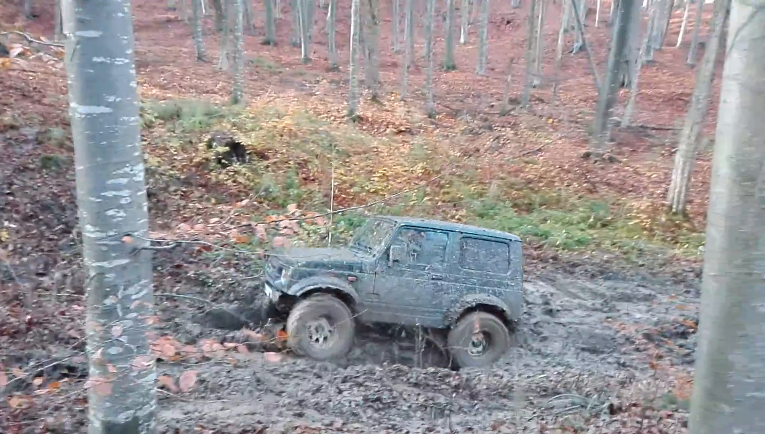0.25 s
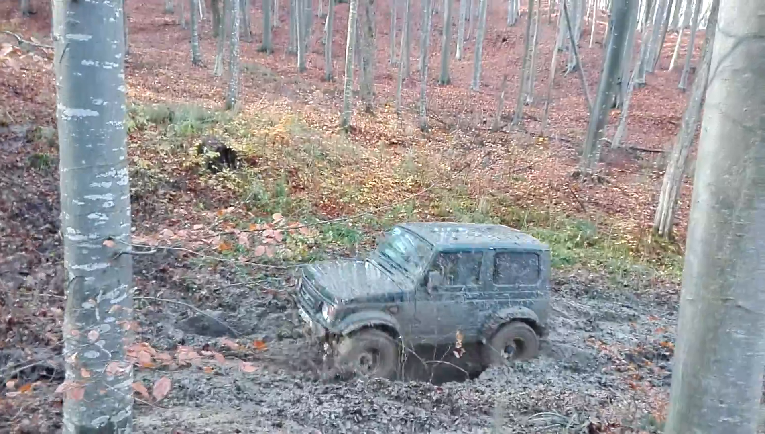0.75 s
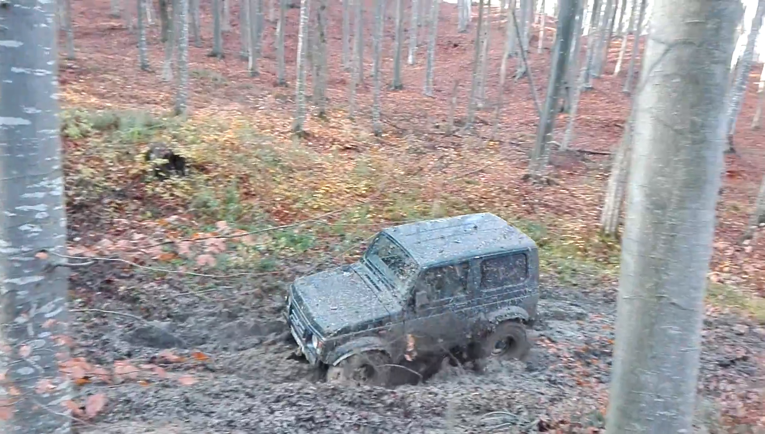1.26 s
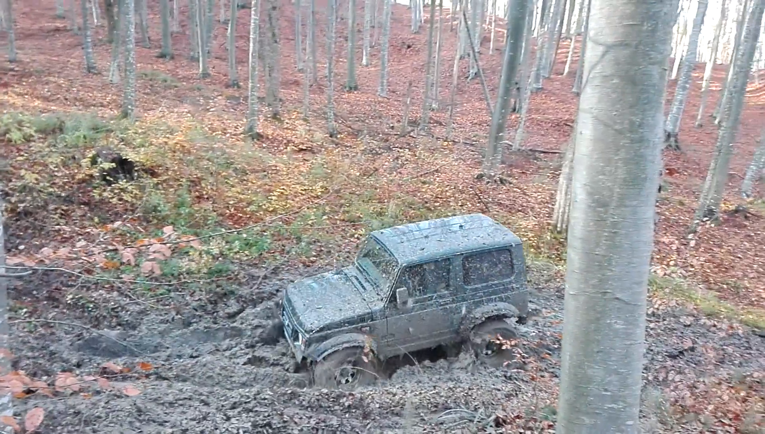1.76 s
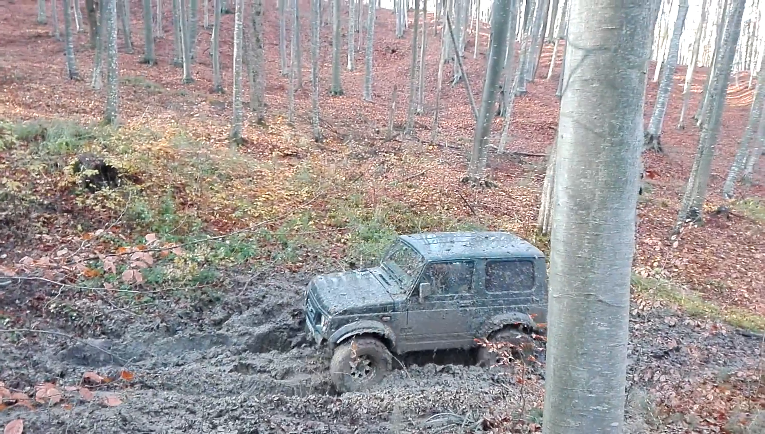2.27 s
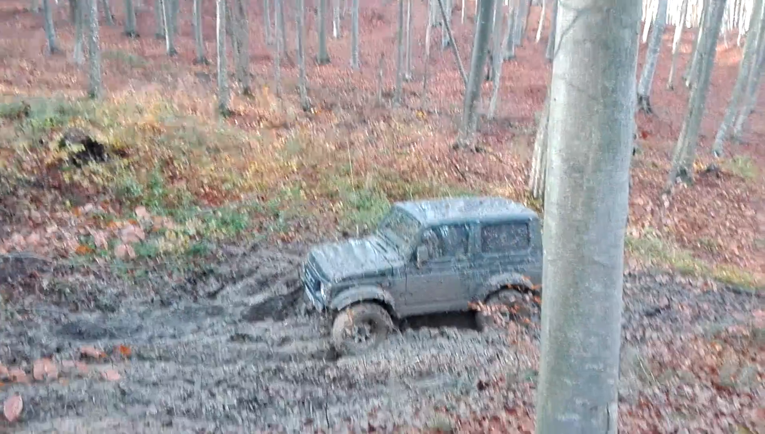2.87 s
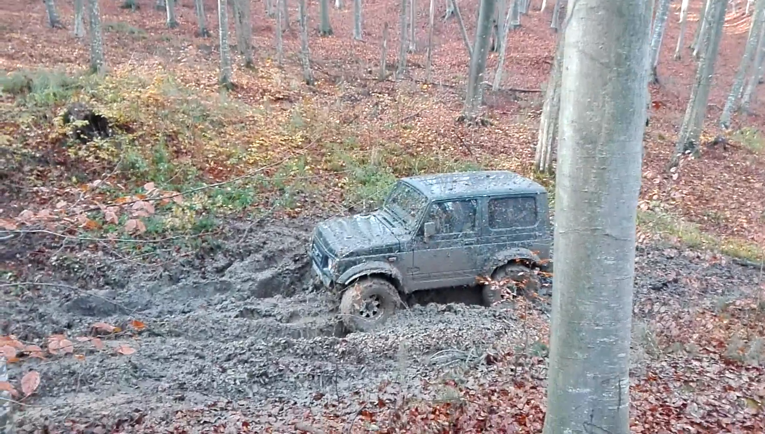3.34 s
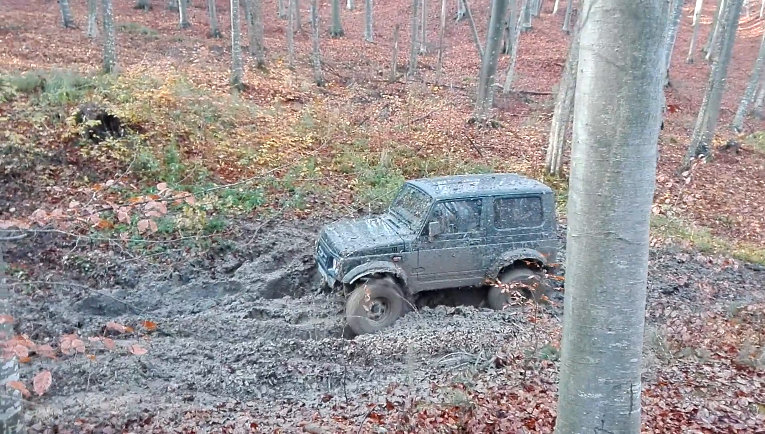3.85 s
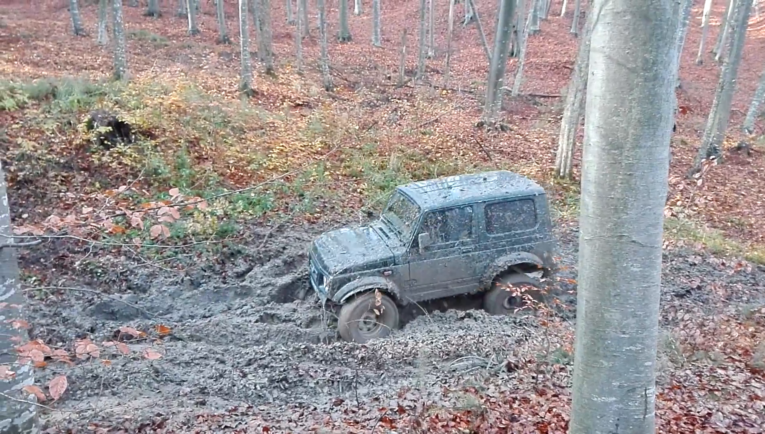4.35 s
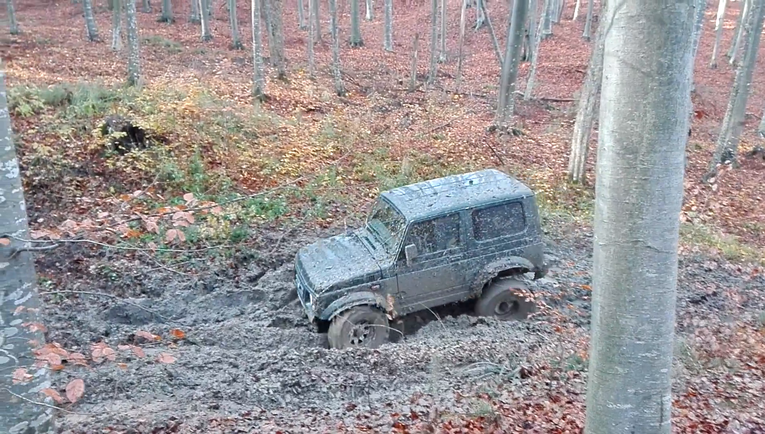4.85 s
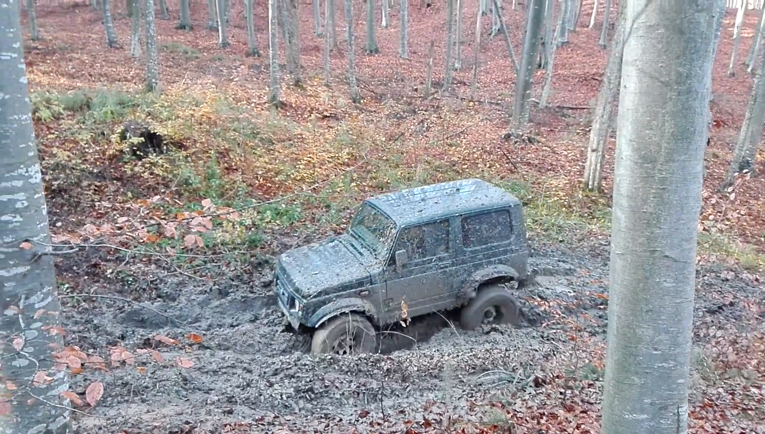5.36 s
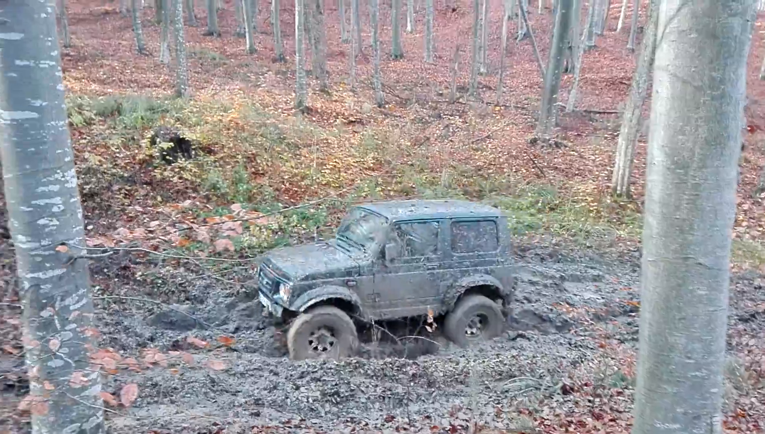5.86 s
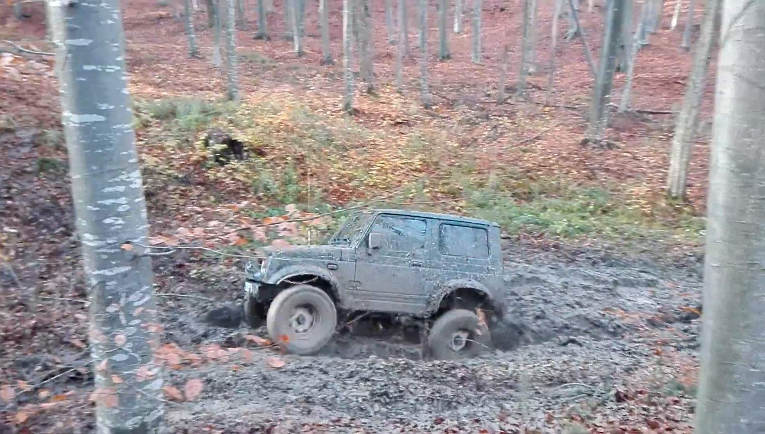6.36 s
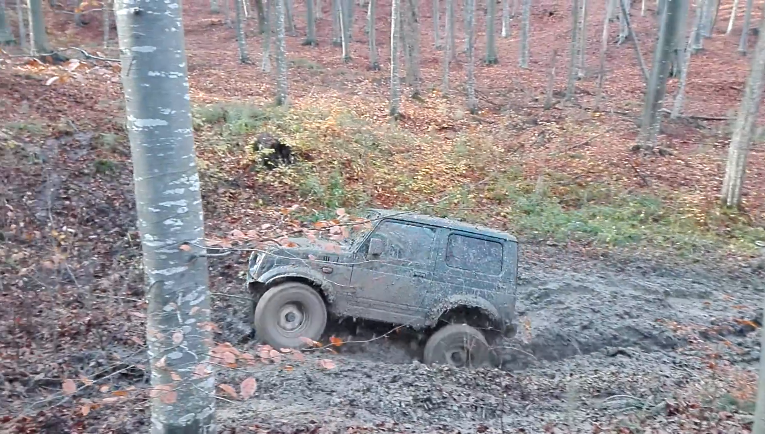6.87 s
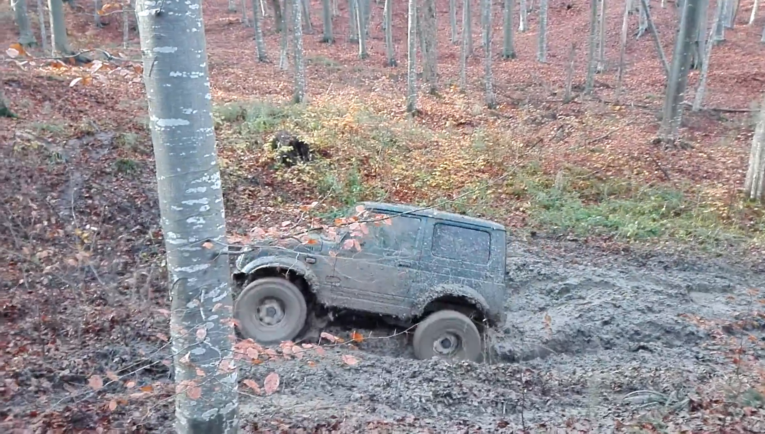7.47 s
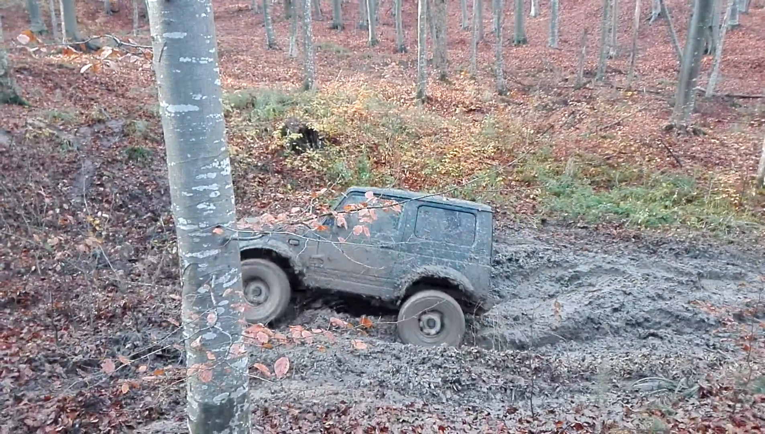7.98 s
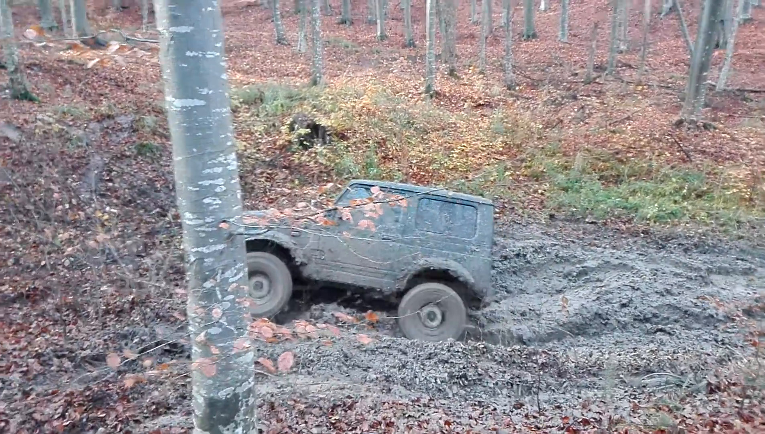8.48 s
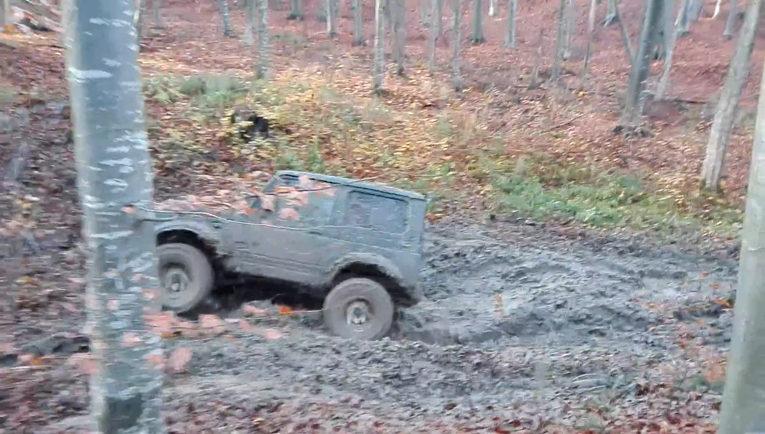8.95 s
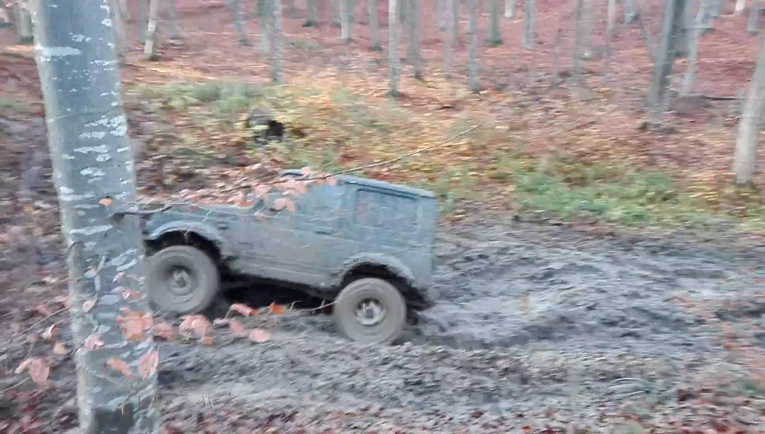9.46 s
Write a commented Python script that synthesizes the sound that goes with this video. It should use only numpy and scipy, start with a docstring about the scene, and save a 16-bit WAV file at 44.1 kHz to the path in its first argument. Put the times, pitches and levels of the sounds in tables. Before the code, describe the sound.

From the start a small four-cylinder engine is already pulling, its low, nearly pure hum strengthening by 0.4 s and rising to a peak near 1.6 s, with wavering overtones, breathy intake roar, clatter and a grainy hiss of flung mud. Around 1.9 s the throttle lifts: a soft thump, the roar and hiss drop, and pitch sags until about 3 s, with light clod ticks between 2.2 and 3 and dull misfires near 2.6 and 3. It revs abruptly, stumbles with thumps around 3.3-3.4, peaks highest near 3.7, then eases by 4.2. From there the pitch climbs gradually, holding around 6.5-7 and cresting about 8.4, while roar and wet hiss swell in waves. One clod ticks near 8.9; it ends still revving. Low shaking and rumble continue beneath. The outdoor sound is dry and central, treble flickering in stereo.

```python
"""A small four-cylinder off-roader revs in deep forest mud, its nearly pure firing tone trailed by wavering overtones.
Throttle-driven intake and block noise roars under a hiss of fan and flung mud, its treble in patchy stereo.
Near two seconds it lifts off: revs and roar drop, the firing tone sags, misfires thump and clods tick.
At three seconds it revs again, peaks before four, eases back, then climbs in waves to the end; a late clod ticks.
Tones follow one engine phase, noises are shaped by frequency, and a low shake and rumble run beneath it all."""
import sys
import numpy as np
from scipy import signal
from scipy.fft import rfft, irfft, next_fast_len
from scipy.io import wavfile
from scipy.ndimage import uniform_filter1d, map_coordinates

SR = 44100
rng = np.random.default_rng(int(sys.argv[2]) if len(sys.argv) > 2 else 0)


def unload_audio(sound):
    """Save the sound as a 16-bit wav file, at the path given as the first command line argument."""
    columns = np.transpose(np.atleast_2d(sound))
    # keep every value between -1 and 1, then stretch to whole-number steps
    steps = np.round(np.clip(columns, -1, 1) * 32767)
    wavfile.write(sys.argv[1], SR, steps.astype(np.int16))


def magnitude_from_level(level_db):
    """Linear magnitude for a level in decibels (20 dB per decade)."""
    exponent = np.asarray(level_db, float) / 20
    return 10 ** exponent


N = 428652
T = np.arange(N) / SR

# engine speed: start_s, firing_rate_hz
ENGINE_SPEED = [(0.0, 118.8), (0.19, 123.5), (0.21, 127.2), (0.73, 142.5), (1.16, 137.7), (1.33, 141.6),
                (1.54, 171.3), (1.65, 173.6), (1.78, 152.3), (1.87, 151.7), (1.92, 143.3), (2.62, 108.8),
                (2.81, 98.3), (2.98, 97.5), (3.0, 99.5), (3.14, 127.6), (3.22, 144.3), (3.38, 138.5),
                (3.46, 138.9), (3.68, 179.6), (3.74, 182.3), (3.79, 179.6), (3.95, 141), (4.11, 141),
                (4.2, 135.8), (4.63, 136.2), (5.68, 164.6), (6.47, 170.6), (7.06, 170.2), (8.42, 182.4),
                (8.77, 174.5), (9.31, 174.8), (9.72, 180.6)]
# firing tone before its sags: start_s, level_db
FIRING_TONE = [(0, -20), (.16, -32), (.24, -17), (.42, -9.5), (.9, -12), (1.22, -12.5), (1.43, -12),
               (1.5, -15.5), (1.78, -16), (2.85, -15.5), (3.4, -14), (3.7, -16.5), (4.2, -16.5),
               (4.45, -22), (4.78, -18.5), (5.05, -12.5), (5.4, -10), (5.68, -11), (5.75, -14.5),
               (6.02, -15.5), (6.27, -12), (6.85, -10.5), (7.0, -14), (7.55, -15.5), (8.0, -18),
               (8.78, -20), (9.16, -22.5), (9.72, -19.5)]
# brief dips of the firing tone under unsteady load: deepest_s, fall_s, recovery_s, depth_db
TONE_SAGS = [(1.374, .1, 0.038, 3), (1.874, 0.1, 0.17, 5), (2.414, 0.13, .15, 7),
             (2.954, 0.075, 0.039, 5.5), (3.134, .12, .04, 3), (3.235, 0.043, 0.046, 11),
             (3.41, .02, 0.26, 7), (3.728, 0.027, .05, 3), (3.93, 0.099, 0.092, 3.5),
             (4.102, 0.058, 0.084, 2.5), (4.254, .06, .1, 3)]
# mean levels of the wavering partials: start_s, half_rate_db, double_rate_db, triple_rate_db
PARTIALS = [(0, -51, -37, -48), (.18, -58, -36, -38), (.4, -53, -44, -45.5), (.6, -53, -39, -49),
            (.8, -62, -33, -43), (1.08, -55, -34, -51), (1.26, -59, -42, -48), (1.44, -57, -39.5, -47),
            (1.65, -55, -41.5, -54), (2.0, -51, -43.5, -52), (2.3, -51, -41, -55.5), (2.52, -52, -52, -55),
            (2.75, -57, -51, -57), (2.9, -55, -44, -63), (2.96, -50, -33, -51), (3.05, -58, -43, -52),
            (3.15, -55, -43, -42.5), (3.25, -48, -50, -64), (3.5, -51, -50, -48), (3.75, -41, -36.5, -50),
            (3.95, -63, -48, -46), (4.2, -50, -41, -37), (4.77, -55, -35.5, -40), (5.19, -49, -46.5, -46),
            (5.61, -51, -32.5, -41), (6.1, -54, -37.5, -40.5), (6.5, -42, -32.5, -62),
            (6.87, -44, -42.5, -46), (7.5, -45, -39, -48), (7.9, -44, -46, -53), (8.3, -39.5, -41.5, -50),
            (8.9, -45, -35, -51), (9.72, -41.5, -38.5, -50)]
# silencer's pass curve for the upper overtones: pitch_hz, gain_db
SILENCER_PASS = [(370, 1), (450, 14), (520, -7), (600, 2.5), (680, -0.5), (750, -2), (820, -1), (900, 2.5)]
# an upper overtone stands out: centre_s, half_length_s, firing_rate_multiple, rise_db
OVERTONE_FLARES = [(.4, .15, 5, 6), (.9, .15, 4, 7), (1.4, .2, 4, 6), (2.5, .3, 4, 7), (3.049, 0.09, 4, 9),
                   (3.6, .1, 4, 8), (3.75, 0.088, 5, 10.5), (4.0, .12, 4, 8), (4.1, .2, 5, 10),
                   (4.95, .2, 5, 11), (5.2, .15, 4, 9), (6.7, .35, 4, 6), (8.1, .2, 5, 6.5),
                   (8.85, .25, 5, 10)]
# throttle, heard as the level of the roar: start_s, level_db
THROTTLE_ROAR = [(0, -43.5), (.62, -39.5), (1.0, -42), (1.8, -42), (1.98, -50), (2.6, -52.5), (2.92, -55),
                 (2.98, -47), (3.15, -43), (3.25, -48), (3.49, -46.5), (3.6, -39.5), (3.74, -38.5),
                 (4.2, -41), (4.98, -42.5), (5.44, -40), (5.68, -38.5), (5.8, -41), (6.47, -39),
                 (7.0, -42.5), (7.5, -41), (7.75, -44.5), (8.3, -42.5), (9.07, -42.5), (9.72, -40)]
# intake boom and panel ring against the roar, before trims: start_s, boom_db, ring_db
BOOM_AND_RING = [(0, -4.5, 0.5), (.9, -3.5, -3), (1.6, -2.5, -9), (1.95, -6.5, -4), (2.6, -9, -4),
                 (2.92, -7, -2), (3.0, -1, 0), (3.12, -1.5, 5), (3.35, -9.5, -2), (3.55, -3, -1.5),
                 (4.2, -1.5, 0), (4.6, -4.5, -2.5), (5.6, -4, -3), (6.4, -4.5, -5), (6.8, -3.5, 2),
                 (7.5, -5, -4), (7.8, -1.5, 0), (8.5, -4, 4.5), (9.1, -5, -4.5), (9.72, -4, -2.5)]
# spectrum of the main roar: pitch_hz, relative_level_db
ROAR_SPECTRUM = [(600, -42.5), (900, -8.5), (1050, -2), (1400, -3), (1900, -9), (2600, -2), (5000, -41)]
# resonances of block and intake: pitch_hz, width_hz, gain_db
BLOCK_RESONANCES = [(1193, 410, 5), (1310, 120, 2.5)]
# spectrum of the intake boom: pitch_hz, relative_level_db
BOOM_SPECTRUM = [(30, -4), (200, -8), (450, -3), (700, -0.5), (880, -2.5), (1100, -24)]
# spectrum of the ringing panel: pitch_hz, relative_level_db
PANEL_SPECTRUM = [(1380, -31), (1500, -9), (1600, 4.5), (1700, -3), (1900, -19)]
# churning tyres: start_s, hiss_db, spray_over_hiss_db
TYRE_LEVELS = [(0, -41, -14), (.1, -39.5, -14.5), (.62, -36, -14), (1.2, -39.5, -14.5), (1.8, -43, -15.5),
               (1.98, -46, -15), (2.6, -49.5, -12.5), (2.9, -54.5, -11.5), (3.08, -43, -18),
               (3.41, -47, -17), (3.62, -40.5, -17.5), (4.2, -37.5, -14.5), (4.76, -40, -16.5),
               (5.44, -37.5, -17), (5.85, -39, -16.5), (6.28, -38, -17), (6.47, -36.5, -12),
               (6.8, -36, -14.5), (7.01, -42, -15.5), (7.5, -42, -16.5), (8.25, -40.5, -16.5),
               (8.53, -38, -14), (9.07, -40, -15.5), (9.72, -40, -13)]
# spectrum of the hiss: pitch_hz, relative_level_db
HISS_SPECTRUM = [(900, -6), (1600, -7), (2200, -6.5), (3000, 0), (4100, -7.5), (5100, -6.5), (6500, -11),
                 (8200, -21.5), (10000, -27.5)]
# spectrum of the brighter spray: pitch_hz, relative_level_db
SPRAY_SPECTRUM = [(5000, -30), (7500, 4), (9000, -5), (10500, 1), (12500, -3), (15000, -7)]
# body resonances in hiss and spray: pitch_hz, width_hz, gain_db
BODY_RESONANCES = [(1950, 115, 7), (2844, 200, -1), (3590, 84, 3), (5000, 300, 1.5), (5510, 200, 3.5)]
# patchy stereo, the random level a treble band must pass to let its side through: pitch_hz, threshold_spreads
SIDE_THRESHOLDS = [(4100, 2.3), (5000, 1.0), (6000, -.1), (7500, -.8), (11000, -1.3), (13500, -.6)]
# a cylinder misses or backfires: centre_s, level_db, pitch_hz
MISFIRE_EVENTS = [(1.889, -23, 90), (2.6, -28, 85), (2.96, -30, 65), (3.26, -21, 91), (3.40, -24, 90)]
# clods strike the body, before a trim: start_s, level_db, pitch_hz
CLOD_EVENTS = [(2.263, -37.5, 2797), (2.368, -49, 8002), (2.461, -45.5, 7000), (2.838, -57.5, 8403),
               (2.943, -44, 5397), (8.857, -35.5, 5900)]
# uneven cylinders shake at fractions of the firing rate: firing_rate_multiple, level_over_shake_db
SHAKE_ORDERS = [(.25, -14), (.75, -5), (1.25, -2.5), (1.5, -23)]
# spectrum of the shaking noise: pitch_hz, relative_level_db
SHAKE_SPECTRUM = [(15, -14), (30, -15.5), (50, -10.5), (90, -3.5), (140, 2.5), (300, -16.5)]
# spectrum of the low rumble, free of the throttle: pitch_hz, relative_level_db
LOW_RUMBLE_SPECTRUM = [(15, -6.5), (30, -5), (55, -0.5), (90, -12), (250, -13), (400, -14), (600, -24)]
# spectrum of the narrow ring, free of the throttle: pitch_hz, relative_level_db
NARROW_RING_SPECTRUM = [(1200, -24), (1265, -6), (1290, 0.5), (1320, -7), (1400, -25)]


def curves(rows):
    """Join a table's columns by straight lines in time."""
    s, *columns = np.transpose(rows)
    return [np.interp(T, s, c) for c in columns]


def unit(x):
    """Scale to rms 1."""
    return x / np.sqrt(np.mean(x ** 2))


def walk(rate):
    """Random levels held 1 / rate s and slewed twice; spread 1."""
    k = int(SR / rate)
    held = np.repeat(rng.standard_normal(N // k + 1), k)
    return unit(uniform_filter1d(uniform_filter1d(held, k), k)[:N])


def colour(x, points, peaks=()):
    """Shape a noise by (Hz, dB) points, raise its resonances and scale it to rms 1."""
    size = next_fast_len(N)
    hz = np.maximum(np.arange(size // 2 + 1) * SR / size, 1)
    at, db = np.transpose(points)
    gain_db = np.interp(np.log(hz), np.log(at), db, left=-90, right=-90)
    gain_db += sum(peak_db / (1 + (2 * (hz - f) / width) ** 2) for f, width, peak_db in peaks)
    spectrum = rfft(x, size, axis=-1) * magnitude_from_level(gain_db)
    return unit(irfft(spectrum, size, axis=-1)[..., :N])


def exhaust(phase, *order_db):
    """Crank-rate tone, firing tone and overtones; higher orders tremble more in level and phase."""
    tones = 0
    for k, db in zip((.5, 1, 2, 3, 4, 5), order_db):
        level = np.sqrt(2) * magnitude_from_level(db + 0.55 * k * walk(30))
        tones = tones + level * np.sin(k * phase + 0.18 * k * walk(25))
    return tones


def sags():
    """Unsteady load pulls the firing tone down in straight falls and recoveries in dB."""
    return sum(np.interp(T, [s - fall, s, s + recovery], [0, -depth_db, 0])
               for s, fall, recovery, depth_db in TONE_SAGS)


def flares(count):
    """Rise in dB of one overtone, a smooth bump for each of its flares."""
    return sum(db * np.exp(-((T - s) / half) ** 2)
               for s, half, k, db in OVERTONE_FLARES if round(k) == count)


def overtones(hz, effort, lower_db):
    """Lower overtones swell and fade; the upper two follow the throttle through the silencer."""
    levels = [db + 2 * walk(8) for db in lower_db]
    for k, base_db in ((4, -59), (5, -59.5)):
        passed_db = np.interp(k * hz, *np.transpose(SILENCER_PASS))
        levels.append(base_db + 1.2 * effort + passed_db + 3 * walk(10) + flares(k))
    return levels


def roar(phase, boom_db, ring_db):
    """Intake noise puffing once a firing and the clatter, both through the body; one panel rings on its own."""
    puff = 1 + 0.15 * np.cos(phase + 0.74 * walk(15))
    mechanical = magnitude_from_level(-8.5) * clatter(phase, hold_s=.2, crank_db=-4, firing_db=3)
    source = puff * rng.standard_normal(N) + mechanical
    boom = magnitude_from_level(boom_db + 1.0 + 1.8 * walk(9)) * colour(source, BOOM_SPECTRUM)
    ring = magnitude_from_level(ring_db - 3.5 + 1.6 * walk(9)) * colour(source, PANEL_SPECTRUM)
    body = magnitude_from_level(1.3 * walk(12)) * colour(source, ROAR_SPECTRUM, BLOCK_RESONANCES)
    return body + boom + ring


def clatter(phase, hold_s, crank_db, firing_db, count=64):
    """Valves and pistons repeat their pattern every four firings; the pattern slowly changes."""
    steps, order = int(N / SR / hold_s) + 2, np.arange(count + 1)
    size = magnitude_from_level(3 * rng.standard_normal((steps, count + 1))) + 0j
    slip = np.cumsum(0.877 * rng.standard_normal((steps, count + 1)), axis=0)
    size *= np.exp(1j * slip)  # each order slips in phase
    size *= np.exp(2j * np.pi * rng.random(count + 1))  # random starting phases
    size *= (order > 6) / (1 + (order / 40) ** 2)  # no lowest orders, softer top
    size[:, 2::4] *= magnitude_from_level(crank_db)  # odd multiples of the crank rate are weaker
    size[:, ::4] *= magnitude_from_level(firing_db)  # whole multiples of the firing rate stand out
    size[:, :21:4] = 0  # the first overtones belong to the exhaust
    cycle = irfft(size, 16 * count)
    place = phase / (8 * np.pi) % 1 * (16 * count - 1)
    return unit(map_coordinates(cycle, [T / hold_s, place], order=1))


def mud(points, flicker_db, grain_db, split_hz):
    """Hiss with mud specks, as middle and side; low and high parts flicker at random, each on its own."""
    hits = rng.random((2, N)) < 400 / SR  # about 400 specks a second
    extra_db = 2 * np.minimum(rng.standard_exponential((2, N)), 4)
    specks = hits * magnitude_from_level(grain_db) * magnitude_from_level(extra_db)
    noise = colour(rng.standard_normal((2, N)) * (1 + specks), points, BODY_RESONANCES)
    low = signal.sosfiltfilt(signal.butter(4, split_hz, fs=SR, output="sos"), noise)
    return magnitude_from_level(flicker_db * walk(40)) * low + magnitude_from_level(flicker_db * walk(50)) * (noise - low)


def patchy_stereo(mid, side, side_db):
    """Patchy stereo, an artefact rather than real width: bands of treble side switch on and off at random."""
    size = next_fast_len(N)
    spectrum, hz, out = rfft(side, size), np.arange(size // 2 + 1) * SR / size, 0
    edges = np.geomspace(4100, 14500, 15)
    shared = walk(30)
    for lo, hi in zip(edges, edges[1:]):
        threshold = np.interp(lo, *np.transpose(SIDE_THRESHOLDS))
        on = np.clip(4 * (.6 * shared + .8 * walk(40) - threshold), 0, 1)
        out = out + on * irfft(spectrum * (hz > lo) * (hz <= hi), size)[:N]
    return mid + magnitude_from_level(side_db) * out * np.array([[1], [-1]])


def misfires():
    """Each is a thump of about two cycles in the pipe."""
    return sum(magnitude_from_level(db) * np.exp(-((T - s) / 0.012) ** 2) * np.sin(2 * np.pi * hz * (T - s))
               for s, db, hz in MISFIRE_EVENTS)


def clods():
    """Clods striking the body: short bursts of noise round each one's pitch."""
    out, t = np.zeros(N), np.arange(SR // 25) / SR
    for s, db, hz in CLOD_EVENTS:
        band = signal.butter(2, [hz / 1.4, hz * 1.27], "band", fs=SR, output="sos")
        noise = unit(signal.sosfilt(band, rng.standard_normal(len(t))))
        burst = noise * t / 0.0025 * np.exp(1 - t / 0.0028)
        out[int(s * SR):int(s * SR) + len(t)] += magnitude_from_level(db - 2.5) * burst
    return out


def orders(phase, table, waver_db, slip):
    """Faint engine orders that fade in and out and slip in phase."""
    return sum(np.sqrt(2) * magnitude_from_level(db + waver_db * walk(6.9)) * np.sin(k * phase + slip * walk(18))
               for k, db in table)


def shaking(phase, hz, effort):
    """Uneven cylinders shake the car: more with throttle, smoother at speed."""
    level_db = -47 + 0.76 * effort - 0.2 * (hz - 140)  # 140 Hz is a middling firing rate
    noise = magnitude_from_level(7.0) * colour(rng.standard_normal(N), SHAKE_SPECTRUM)
    return magnitude_from_level(level_db) * (noise + orders(phase, SHAKE_ORDERS, waver_db=2.0, slip=1.0))


def low_rumble():
    """Low noise that holds its level apart from a slow waver."""
    return magnitude_from_level(-50.5 + 1.7 * walk(3)) * colour(rng.standard_normal(N), LOW_RUMBLE_SPECTRUM)


def narrow_ring():
    """A faint narrow band of noise that rings throughout, wavering in level."""
    return magnitude_from_level(-57.5 + 2.5 * walk(6)) * colour(rng.standard_normal(N), NARROW_RING_SPECTRUM)


def scene():
    """Everything sits in the middle except the patchy treble side of hiss and spray."""
    (hz,), (firing_db,), (roar_db,) = curves(ENGINE_SPEED), curves(FIRING_TONE), curves(THROTTLE_ROAR)
    crank_db, *lower_db = curves(PARTIALS)
    hiss_db, spray_db = curves(TYRE_LEVELS)
    effort = roar_db + 44  # dB over the roar at part throttle
    phase = 2 * np.pi * np.cumsum(uniform_filter1d(hz, size=2000)) / SR
    sagging_db = uniform_filter1d(firing_db + sags(), size=250)
    engine = exhaust(phase, crank_db, sagging_db, *overtones(hz, effort, lower_db))
    engine += magnitude_from_level(roar_db) * roar(phase, *curves(BOOM_AND_RING))
    hiss = magnitude_from_level(hiss_db) * mud(HISS_SPECTRUM, flicker_db=0.93, grain_db=6.0, split_hz=3560)
    spray = magnitude_from_level(hiss_db + spray_db) * mud(SPRAY_SPECTRUM, flicker_db=2.2, grain_db=6.5, split_hz=11100)
    tyres = patchy_stereo(*(hiss + spray), side_db=-3)
    background = shaking(phase, hz, effort) + low_rumble() + narrow_ring()
    return engine + tyres + misfires() + clods() + background


def top_cut(x):
    """Nothing passes above the cut-off."""
    return signal.sosfilt(signal.butter(12, 14180, fs=SR, output="sos"), x)


def record(dry):
    """Takes the finished mix as it stands, with no added room or noise."""
    return top_cut(dry)


dry = scene()
out = record(dry)
unload_audio(out)
```